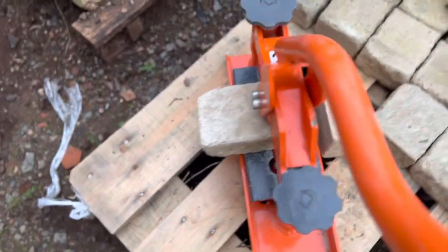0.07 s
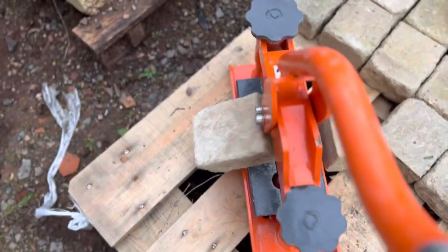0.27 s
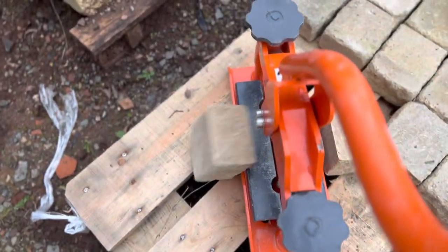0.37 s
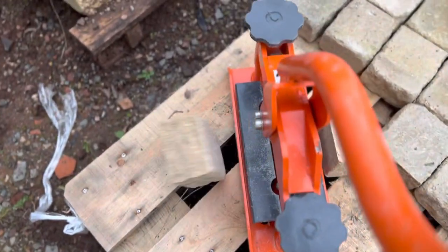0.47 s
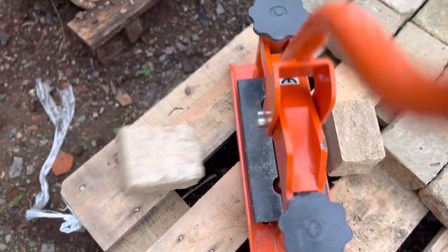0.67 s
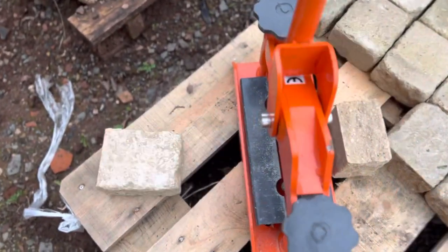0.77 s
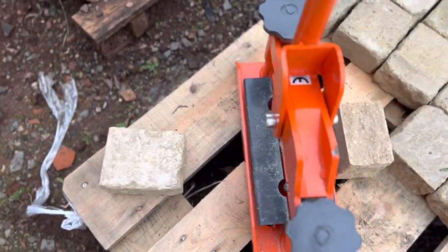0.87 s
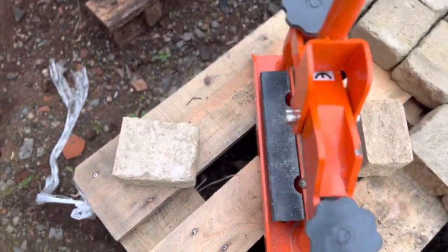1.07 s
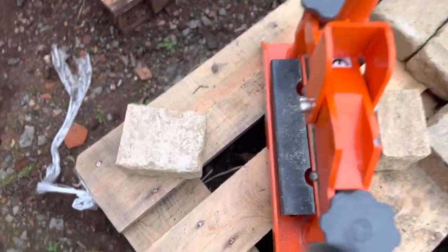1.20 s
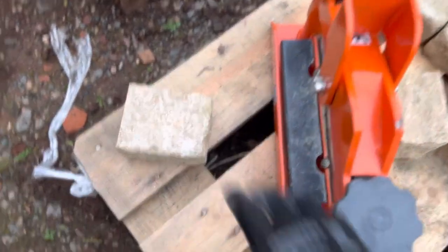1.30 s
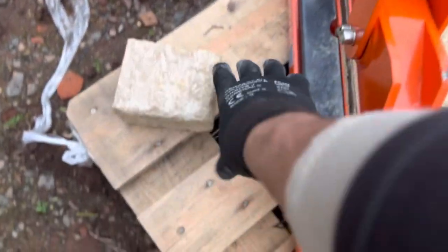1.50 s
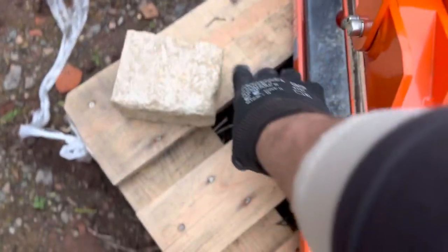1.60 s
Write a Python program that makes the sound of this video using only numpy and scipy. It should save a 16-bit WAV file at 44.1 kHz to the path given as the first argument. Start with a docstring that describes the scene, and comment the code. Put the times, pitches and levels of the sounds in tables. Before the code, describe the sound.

Close by outdoors, a steel splitter crunches into a paving stone and snaps it. The pieces clatter over the steel bed and onto a wooden pallet before the lever hits its stop with a short ringing clank.

```python
"""A hand lever splitter cracks a paving stone outdoors, close to the microphone.
The blade crunches in, the loaded steel squeaks, and the blade rings as the stone snaps with sharp clicks.
Its halves knock over the steel bed and tumble onto a wooden pallet; each blow makes steel or wood ring.
The lever swings back, scraping, and hits its stop with a clank and a short steel ring.
Behind the work are a faint echo, a low rumble and the quiet hiss of the yard."""
import sys
import numpy as np
from scipy import signal
from scipy.fft import rfft, irfft
from scipy.io import wavfile
from scipy.ndimage import uniform_filter1d, minimum_filter1d

SR = 44100
rng = np.random.default_rng(int(sys.argv[2]) if len(sys.argv) > 2 else 0)


def dump_mix(stems):
    """Bounce the given channels to the path in sys.argv[1] as a 16-bit WAV at rate SR."""
    frames = np.atleast_2d(stems).T  # one column per channel
    limited = np.clip(frames, -1, 1)  # hard clip at full scale
    pcm = np.round(limited * 32767).astype(np.int16)
    wavfile.write(sys.argv[1], SR, pcm)


N = 72765
t = np.arange(N) / SR

# Blows on the steel frame and on the wooden pallet. Each row: start in seconds, level in dB,
# treble cutoff in Hz, bass boost in dB, then ring and tail in dB compared with the thud.
FRAME_BLOWS = [(.001, -37.5, 1482, -8.5, -11, -2.5), (.0405, -39, 995, -20, -1.5, -1),
               (.0678, -28, 942, 5, 8.5, 12.5), (.1445, -36, 700, 0, -14, -6.5),
               (.158, -45, 1590, 1.5, -20, -11.5), (.2455, -15, 3700, -18.5, -2.5, -3),
               (.2465, -18, 900, -16, 3.5, -32), (.2575, -27.5, 3186, -15.5, -0.5, -10),
               (.3485, -31.5, 2000, -20, -4, -10), (.365, -16, 798.6, -12, 4, -3),
               (.3768, -14.5, 3363, 5.5, 4.5, -3.5), (.8926, -13.5, 10880, 3, 0.5, -13.5),
               (.9068, -23.5, 3540, 6.5, -0.5, -13.5)]
PALLET_BLOWS = [(.378, -19, 600, 1, 2.5, -11), (.386, -25, 162.5, 9.5, 3.5, -7.5),
                (.413, -27.5, 398, 5.5, 6, -22.5), (.447, -24.5, 604.5, 7, -6.5, -13),
                (.4535, -21, 302, 9.5, -4.5, -6.5), (.4775, -31.5, 3010, -6.5, -4.5, -4),
                (.517, -29.5, 1948, -5.5, 6, 4), (.534, -20, 2965, -1.5, 7.5, -2),
                (.546, -18.5, 2091, 8, 1, -1.5), (.553, -23, 703.4, 1.5, 9.5, 0),
                (.688, -29, 900, -17, -10, -8.5), (.6955, -9, 1450, -3.5, -2, -22),
                (.704, -19.5, 378, 10, 1, -21.5), (.716, -20.5, 650, -5.5, -10.5, -15.5),
                (.7598, -37.5, 900, 6, -2.5, -14.5), (.794, -50, 1200, 3, -2, -7)]
# Modes are the tones a struck thing rings with. Each row: pitch in Hz, level in dB, fade time in seconds.
# A fade time (t60) is how long a sound takes to drop by 60 dB.
FRAME_MODES = [(344.5, -8, 0.14), (410.2, -22.5, 0.48), (507, -8, .04), (570, 2.5, 0.028),
               (671.7, -1, 0.082), (978, -10.5, 0.071), (1084, -17, 0.015), (1172, -14, 0.1),
               (1695, -24.5, 0.24), (1890, -18.5, 0.099), (2496, -7.5, 0.061), (2806, -21.5, 0.11),
               (3405, -13.5, 0.084), (5653, -17, 0.11)]
PALLET_MODES = [(137.5, -11, 0.096), (294, 0.5, 0.089), (370, 1, 0.042), (620.7, 5.5, 0.05),
                (680, -5.5, 0.084), (840, -12, 0.013), (942, -11.5, .06), (1094, -7, 0.0742),
                (1400, -17.5, 0.088), (1689, -6, 0.025)]
LEVER_MODES = [(98.3, -30, 0.2), (339.6, -18, .06), (400, -33.5, 0.39), (650, -33.5, 0.13),
               (980, -40.5, 0.25), (1196, -19, 0.0385), (1750, -29.5, .13), (1872, -38, 0.16),
               (2272, -9, 0.029), (2880, -31.5, 0.2), (3411, -26.5, 0.11), (4540, -55.5, 0.48),
               (4530, -41.5, 0.18), (5292, -38, 0.31), (5790, -31.5, 0.061), (12370, -62.5, .44),
               (12600, -60, .13)]
# Heavy pushes of the stone, then short clicks: stone edges and chips, and the lever's clank at its stop.
# Each row: start in seconds, level in dB, pitch in Hz, fade time in seconds.
THUMPS = [(.2472, -15, 587, 0.019), (.3665, -18.5, 649, 0.073), (.4485, -20.5, 316, 0.069),
          (.554, -22, 363, .03), (.696, -9, 643, 0.019), (.7605, -33, 370, 0.033)]
CLICKS = [(0.2441, -49, 7400, 0.038), (.378, -36.5, 8054, 0.029), (0.3647, -28.5, 1790, 0.076),
          (0.379, -25, 2330, 0.035), (0.5063, -46, 11500, 0.012), (.507, -50.5, 6100, .04),
          (0.5333, -38.5, 2260, 0.012), (0.5354, -44, 5000, 0.048), (.57, -43.5, 5323, .062),
          (.571, -25, 1240, 0.047), (.697, -22, 1120, 0.08), (.6958, -46, 7070, 0.021),
          (0.7108, -45.5, 5573, 0.036), (0.866, -51, 10800, 0.026), (.8928, -21.5, 2270, 0.034)]
# Brief steel tones: squeaks under load, and the blade's ring as the stone snaps.
# Each row: start in seconds, length in seconds, level in dB, pitch in Hz.
STEEL_TONES = [(0.039, 0.077, -35.5, 668), (0.125, 0.026, -50, 2690), (0.253, 0.096, -49.5, 4410),
               (0.71, .075, -50.5, 1890)]

# The tone colour of each noisy sound. Each row: frequency in Hz, relative strength there in dB.
FRAME_THUD_COLOUR = [(60, -31), (110, -10.5), (190, -21), (330, -1), (650, -5), (850, -9.5), (1200, 0),
                     (1700, -15.5), (2500, -10.5), (4000, -12.5), (8000, -21), (11000, -30.5),
                     (16000, -57.5)]
PALLET_THUD_COLOUR = [(60, -29), (150, -10), (320, 1.5), (650, -5), (1200, -6), (2200, -9), (4000, -20),
                      (8000, -20.5), (16000, -38)]
STONE_RUB_COLOUR = [(100, -16), (350, 5.5), (650, 0), (1000, 0.5), (1600, -12.5), (3000, -21.5),
                    (8000, -36.5), (16000, -50.5)]
LEVER_SCRAPE_COLOUR = [(100, -8.5), (450, -0.5), (680, 0), (1000, -1), (1450, -7), (2100, -4.5),
                       (3200, -24), (4800, -23.5), (8000, -37.5), (15000, -60)]
LEVER_RATTLE_COLOUR = [(200, -7.5), (620, -1), (2400, 5), (14000, -33.5)]
ECHO_COLOUR = [(100, -10), (300, 2), (900, -1), (2500, -2), (6000, -4), (14000, -12.5)]
HISS_COLOUR = [(200, 2.5), (1000, 3.5), (3000, -5.5), (8000, -0.5), (9700, -12), (12000, -5),
               (16000, -25.5)]
AIR_COLOUR = [(76, -30.5), (130, -1.5), (243, -12), (370, -12), (1220, -16), (2270, -26), (3500, -22.5),
              (5200, -21.5), (8000, -43), (16000, -55)]
# How the rubbing, rumble and hiss rise and fall. Each row: time in seconds, level in dB.
RUB_LEVELS = [(0, -64), (.06, -45), (.12, -69), (.16, -41.5), (.2, -65), (.31, -51.5), (.47, -49),
              (.54, -30.5), (.61, -45), (.68, -53), (.74, -38), (.82, -64), (.9, -96.5)]
RUMBLE_LEVELS = [(0, -45.5), (.2, -54), (.27, -42.5), (.34, -53), (.72, -52.5), (.81, -56.5), (.95, -51),
                 (1.08, -62), (1.22, -60), (1.255, -47.5), (1.3, -58), (1.38, -58), (1.5, -64.5),
                 (1.65, -59.5)]
HISS_LEVELS = [(0, -53.5), (.2, -58), (.35, -47), (.43, -60.5), (.66, -64.5), (.8, -72), (1.08, -72),
               (1.19, -60.5), (1.23, -79), (1.33, -76), (1.42, -66.5), (1.65, -76)]
# How much weaker the left ear hears the work. Each row: frequency in Hz, left minus right in dB.
EAR_BALANCE = [(60, -4), (300, -2), (1000, -4.5), (4500, -5), (8000, -0.5)]
# How much later the left ear hears it. Each row: frequency in Hz, lag in radians.
LEFT_EAR_LAG = [(60, 0.031), (650, 0.044), (1400, 1.9), (6000, 0)]

OPPOSITE_EARS = np.array([[1], [-1]])  # plus on the left, minus on the right
STEREO_ABOVE_HZ = 330  # above this, left and right differ


def splitter_frame(count=26, low_hz=1298, high_hz=8930):
    """Blade and stone strike the steel frame, ringing its main modes and many weak ones in its plates."""
    place, weakness = rng.random((count, 2)).T
    pitches = low_hz * (high_hz / low_hz) ** ((np.arange(count) + place) / count)
    levels = -15 - 5 * np.log2(pitches / low_hz) - 10 * weakness  # 5 dB weaker each octave up
    plate_modes = [(hz, db, .1) for hz, db in zip(pitches, levels)]
    return blows(FRAME_BLOWS, FRAME_MODES + plate_modes, FRAME_THUD_COLOUR, t60=.044, tail_t60=.13)


def pallet():
    """The stone halves land on wood, which stops ringing sooner than steel."""
    return blows(PALLET_BLOWS, PALLET_MODES, PALLET_THUD_COLOUR, t60=.036, tail_t60=.041)


def blows(rows, modes, body_colour, t60, tail_t60, bass_hz=260):
    """Each blow makes a short thud, a rattling tail and a ring; soft contact takes off the treble."""
    out, age = np.zeros((2, N)), t[:16384]
    for start, db, cutoff_hz, bass_db, ring_db, tail_db in rows:
        hit = thud(body_colour, age, t60, treble_damping=.65)
        hit += undb(tail_db) * thud(body_colour, age, tail_t60, treble_damping=.044)
        hit += undb(ring_db) * punch(ring(modes, age))
        bass = signal.lfilter(*signal.butter(1, bass_hz, fs=SR), hit)
        hit += (undb(bass_db) - 1) * bass
        hit = signal.lfilter(*signal.butter(2, cutoff_hz, fs=SR), hit)
        add(out, start, undb(db) * punch(hit))
    return out


def thud(body_colour, age, t60, treble_damping):
    """Crowded modes blur into bands of noise. t60 holds at 1000 Hz; higher bands die sooner."""
    f, spectrum = noise_spectrum(len(age))
    out = 0
    for hz in 62 * 2 ** (np.arange(17) / 2):  # half an octave apart
        band = irfft(spectrum * bell(f, hz, octaves=.22), len(age))
        band *= swell(age, hz, t60 * (1000 / hz) ** treble_damping)
        out += punch(band) * colour(body_colour, hz) * np.sqrt(hz)
    return punch(out)


def ring(modes, age):
    """A struck thing rings with fading tones; the high ones reach the two ears out of step."""
    out = 0
    for k, (hz, db, t60) in enumerate(modes):
        detune, spread = rng.standard_normal(2)
        ear_phase = OPPOSITE_EARS * .56 * np.tanh(2 * spread) * hz / (hz + STEREO_ABOVE_HZ)
        tone = np.sin(2 * np.pi * (hz + 2 * detune) * age + ear_phase)
        out += (-1) ** k * undb(db) * swell(age, hz, t60) * tone
    return out


def stone_thumps():
    """The weight of the snapping or landing stone gives each big blow a short, pitched push."""
    out, age = np.zeros((2, N)), t[:8192]
    for start, db, hz, t60 in THUMPS:
        add(out, start, undb(db) * punch(ring([(hz, 0, t60)], age)))
    return out


def clicks():
    """Stone edges and chips click, and the lever clanks at its stop; each rings briefly at one pitch."""
    out, age = np.zeros((2, N)), t[:8192]
    for start, db, hz, t60 in CLICKS:
        click = noise(lambda f: bell(f, hz, octaves=.075) + bell(f, hz, octaves=.42) / 4, len(age))
        add(out, start, undb(db) * punch(click * swell(age, hz, t60)))
    return out


def steel_tones(rise_s=.006, pitch_waver=.0089):
    """Steel squeaks under load, and the blade rings as the stone snaps; each brief tone wavers."""
    out = np.zeros(N)
    for start, length, db, hz in STEEL_TONES:
        age = t - start
        loudness = np.clip(age / rise_s, 0, 1) * np.clip(1 - age / length, 0, 1) ** .5
        pitch = hz * (1 + pitch_waver * waver(hz=90))
        out += undb(db) * loudness * np.sin(2 * np.pi * np.cumsum(pitch) / SR)
    return out


def lever(swing_at_s=.845, stop_at_s=.8928, scrape_db=-34, rattle_db=-36.5, flutter_db=2):
    """The lever scrapes in its pivot, then rings against the stop and rattles as it settles."""
    since_stop = np.maximum(t - stop_at_s, 0)
    scraping = np.clip((t - swing_at_s) / .018, 0, 1) ** .5 * fade(since_stop, t60=.02)
    rattling = np.clip(since_stop / .011, 0, 1) * fade(since_stop, t60=.053)
    out = undb(scrape_db) * scraping * friction(LEVER_SCRAPE_COLOUR)
    out += undb(rattle_db) * rattling * friction(LEVER_RATTLE_COLOUR)
    for mode in LEVER_MODES:  # the loose lever shakes the level of each tone
        add(out, stop_at_s, ring([mode], t) * undb(flutter_db * waver(hz=45)))
    return out


def stone_rubbing():
    """The stone grinds under the blade, then its halves slide and rock."""
    return level_curve(RUB_LEVELS) * friction(STONE_RUB_COLOUR)


def friction(body_colour, slips_per_s=1300, slip_s=.0018, spread_db=.5):
    """Rough surfaces catch and slip many times a second; each slip is a tiny burst of noise."""
    slips = (rng.random(N) < slips_per_s / SR) * undb(spread_db * rng.standard_normal(N))
    bursts = signal.lfilter([1], [1, -np.exp(-1 / (SR * slip_s))], slips)
    grit = bursts * noise(np.ones_like)
    f = np.fft.rfftfreq(N, 1 / SR)
    return unit(irfft(rfft(grit) * colour(body_colour, f), N))


def echo(sound, db=-37.5, t60=.68, delay_s=.0067):
    """Stacked stones and the yard around scatter a little of the sound back."""
    arrival = np.clip(t / delay_s - 1, 0, 1)
    reflections = noise(lambda f: colour(ECHO_COLOUR, f)) * fade(t, t60) * arrival
    reflections /= np.sqrt(np.sum(reflections ** 2) / 2)
    return undb(db) * signal.fftconvolve(sound, reflections, axes=1)[:, :N]


def rumble():
    """A low, uneven rumble lies under the work."""
    return level_curve(RUMBLE_LEVELS) * noise(lambda f: bell(f, hz=55.4, octaves=.59))


def yard(air_db=-65.5, wide_db=-6.5):
    """Quiet outdoor air and a thin hiss that comes and goes, one high band opposite in the two ears."""
    wide_band = noise(lambda f: bell(f, hz=9600, octaves=.07))[0] * OPPOSITE_EARS
    hiss = noise(lambda f: colour(HISS_COLOUR, f)) + undb(wide_db) * wide_band
    air = noise(lambda f: colour(AIR_COLOUR, f))
    return level_curve(HISS_LEVELS) * hiss + undb(air_db) * air


def to_the_right(sound):
    """The left ear hears a sound on the right weaker and later."""
    f = np.fft.rfftfreq(N, 1 / SR)
    lag = np.interp(f, *np.array(LEFT_EAR_LAG).T)
    share = OPPOSITE_EARS / 2  # each ear takes half of the difference
    return irfft(rfft(sound) * colour(EAR_BALANCE, f) ** share * np.exp(-1j * lag * share), N)


def swell(age, hz, t60, rise_cycles=.53, lag_s=.00022):
    """A tone builds up and dies; low bending waves arrive later and build up more slowly."""
    age = np.maximum(age - lag_s * np.sqrt(500 / hz), 0)
    return (1 - np.exp(-age * hz / rise_cycles)) * fade(age, t60)


def fade(age, t60):
    """Die away by 60 dB every t60 seconds."""
    return np.exp(-np.log(1000) * age / t60)


def noise_spectrum(size, width=.91):
    """Frequencies and a random stereo spectrum: the ears match in the bass, less so in the treble."""
    f = np.fft.rfftfreq(size, 1 / SR)
    shared, side = np.exp(2j * np.pi * rng.random((2, len(f))))
    return f, shared + OPPOSITE_EARS * side * width * f ** 2 / (f ** 2 + STEREO_ABOVE_HZ ** 2)


def noise(shape, size=N):
    """Stereo noise; shape gives its strength at each frequency."""
    f, spectrum = noise_spectrum(size)
    return unit(irfft(spectrum * shape(f), size))


def waver(hz):
    """A random wobble, up to about hz times a second."""
    f = np.fft.rfftfreq(N, 1 / SR)
    return unit(irfft(rfft(rng.standard_normal(N)) * np.exp(-(f / hz) ** 2), N))


def bell(f, hz, octaves):
    """A smooth hill of frequencies around hz."""
    return np.exp(-.5 * (np.log2((f + 1) / hz) / octaves) ** 2)


def colour(rows, hz):
    """Read the gain at hz from a table of frequencies and dB."""
    frequencies, levels = np.array(rows).T
    return undb(np.interp(np.log(hz + 1), np.log(frequencies), levels))


def level_curve(rows):
    """Read the gain at every moment from a table of times and dB."""
    return undb(np.interp(t, *np.array(rows).T))


def undb(db):
    """Turn decibels into a gain, a number to multiply by."""
    return 10 ** (np.asarray(db) / 20)


def unit(sound):
    """Scale to an average (rms) level of 1."""
    return sound / np.sqrt(np.mean(sound ** 2))


def punch(hit):
    """Scale a hit to the energy of 10 ms of sound at level 1."""
    return hit / np.sqrt(np.mean(np.sum(hit ** 2, axis=-1)) / (SR * .01))


def add(out, start, sound):
    """Mix a sound in at its start time in seconds."""
    i = int(start * SR)
    out[:, i:i + sound.shape[1]] += sound[:, :N - i]


def scene():
    """The splitter and pallet stand a little to the right in a quiet yard."""
    work = splitter_frame() + pallet() + stone_thumps() + clicks()
    work += steel_tones() + lever() + stone_rubbing()
    return to_the_right(work + echo(work) + rumble()) + yard()


def record(dry, low_cut_hz=48, limit_db=1.26, hold_s=.004, top_hz=16600):
    """The microphone drops the deepest bass, a limiter holds down the highest peaks, the top is cut."""
    dry = signal.lfilter(*signal.butter(2, low_cut_hz, "high", fs=SR), dry)
    hold = int(hold_s * SR)
    gain = np.minimum(1, undb(limit_db) / (np.abs(dry).max(axis=0) + 1e-9))
    limited = dry * uniform_filter1d(minimum_filter1d(gain, hold), hold)
    return signal.sosfilt(signal.ellip(8, .2, 80, top_hz, fs=SR, output="sos"), limited)


dry = scene()
out = record(dry)
dump_mix(out)
```